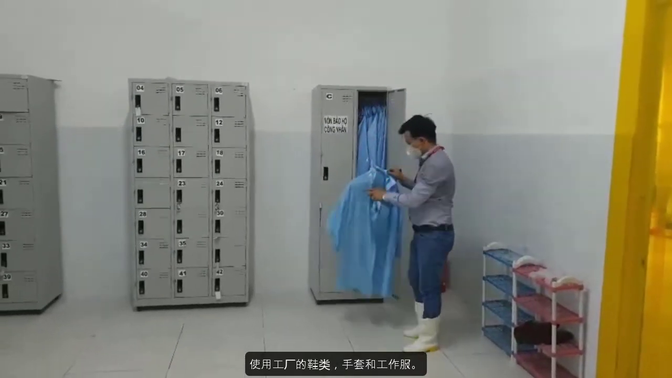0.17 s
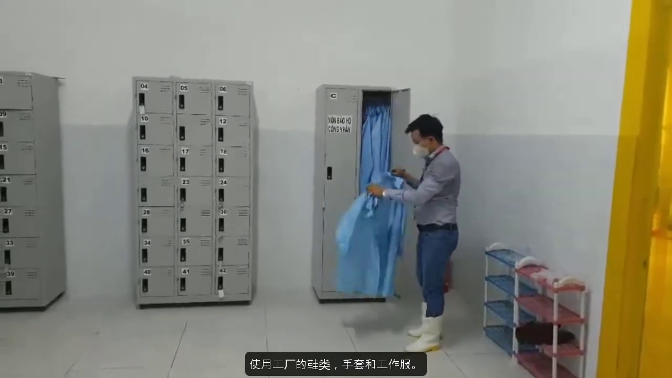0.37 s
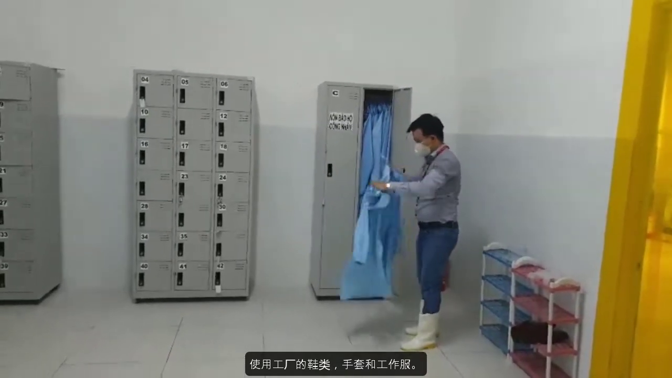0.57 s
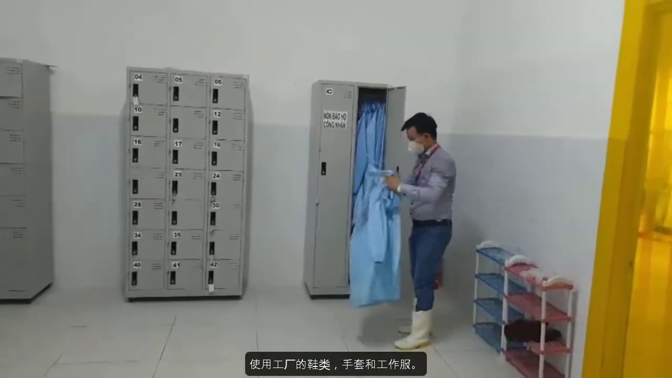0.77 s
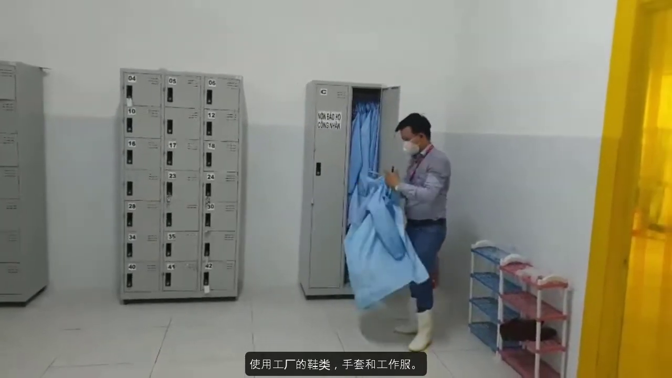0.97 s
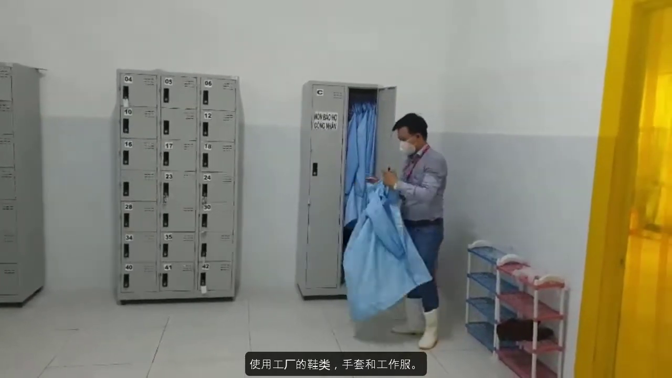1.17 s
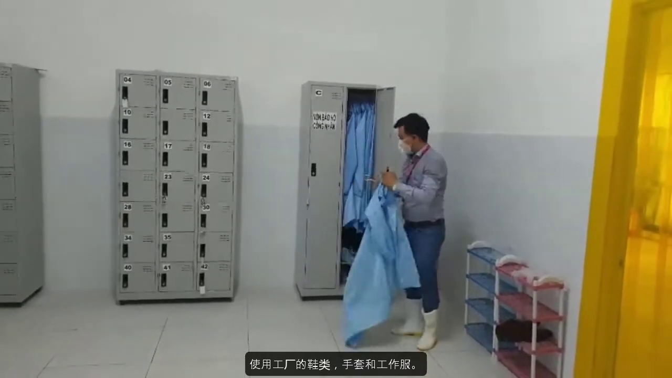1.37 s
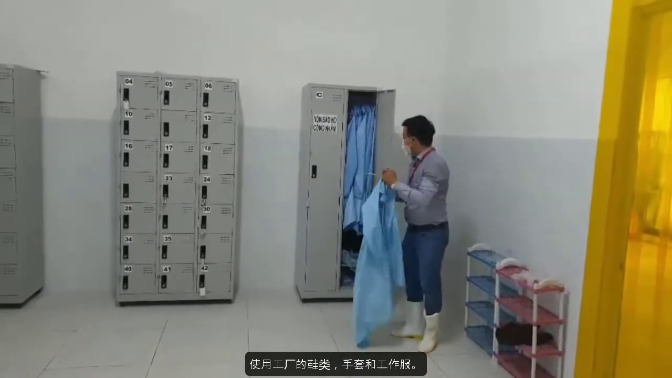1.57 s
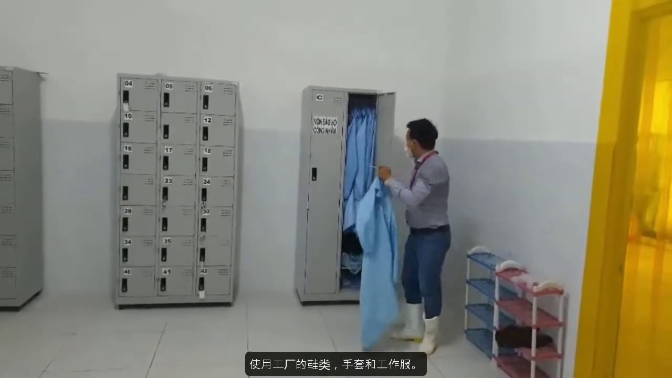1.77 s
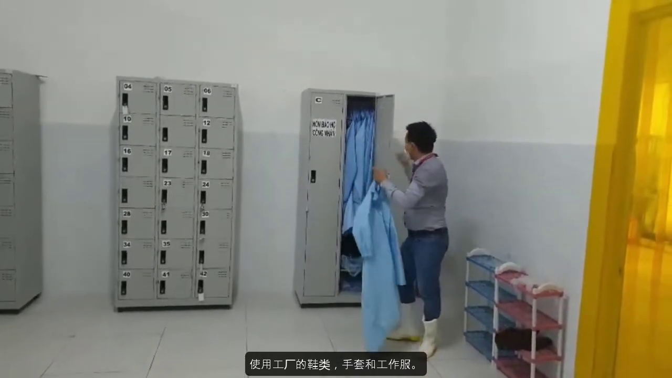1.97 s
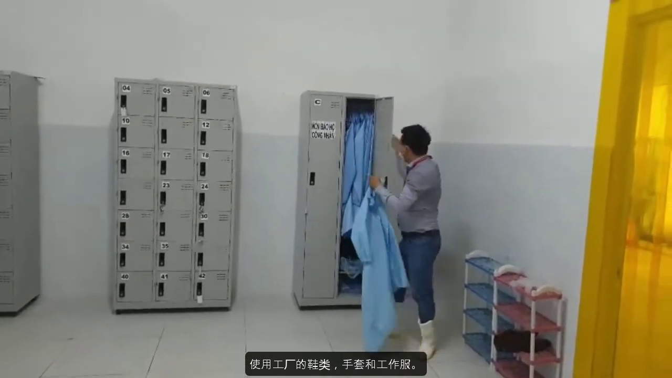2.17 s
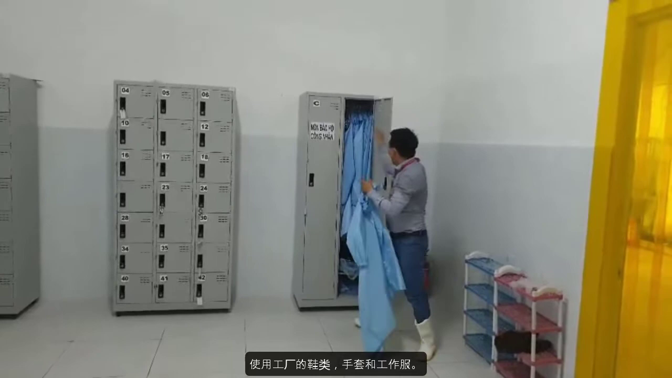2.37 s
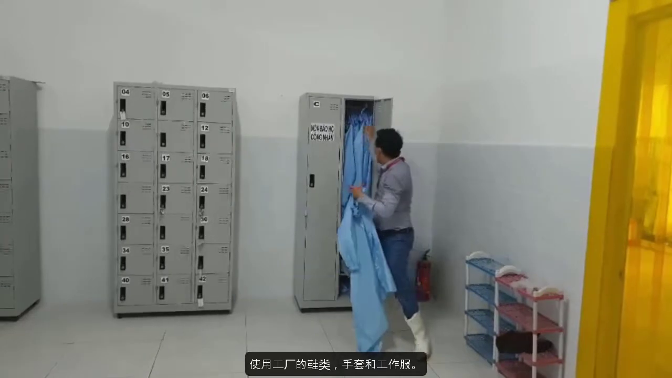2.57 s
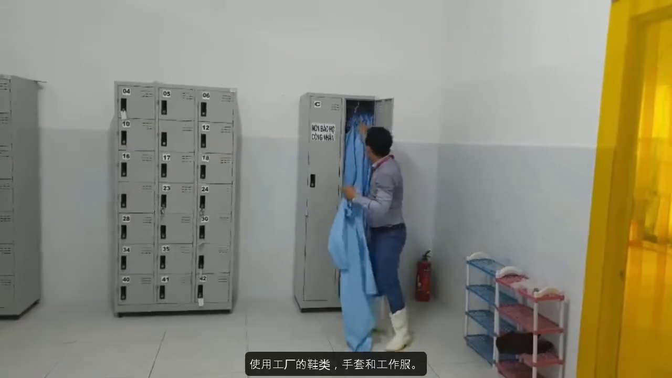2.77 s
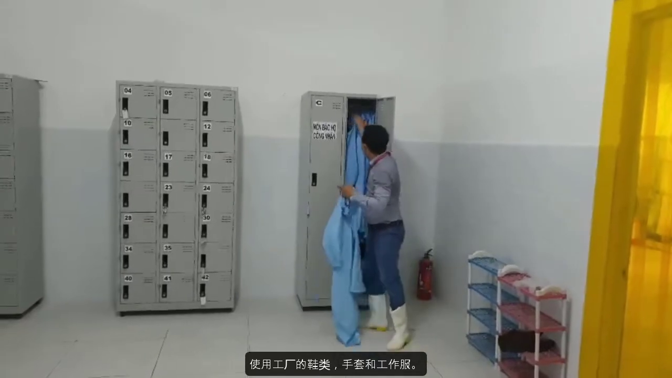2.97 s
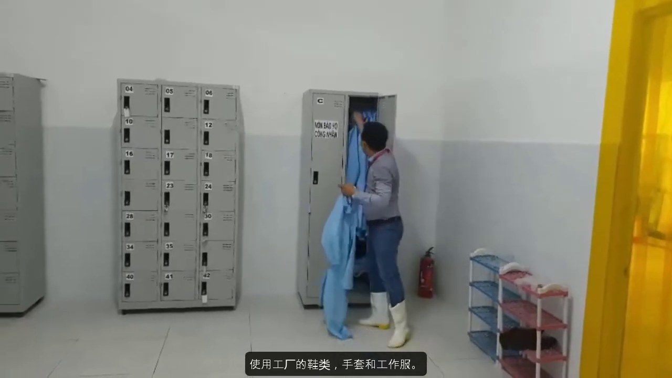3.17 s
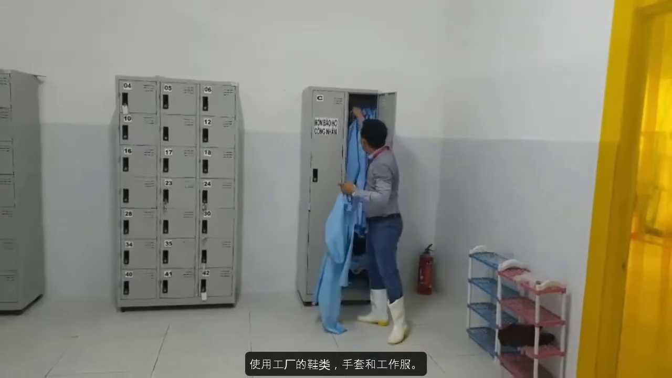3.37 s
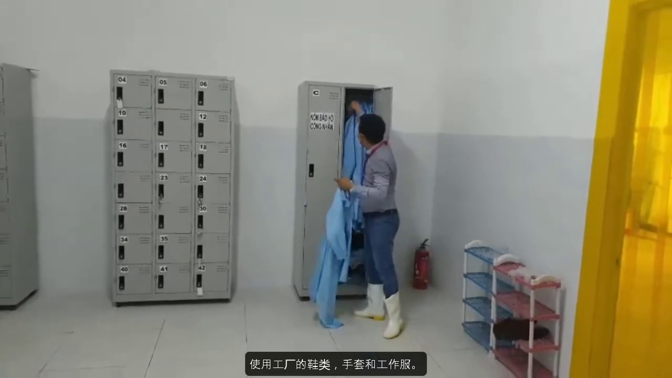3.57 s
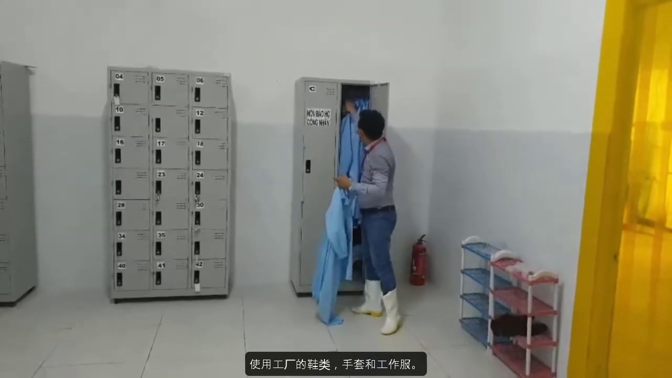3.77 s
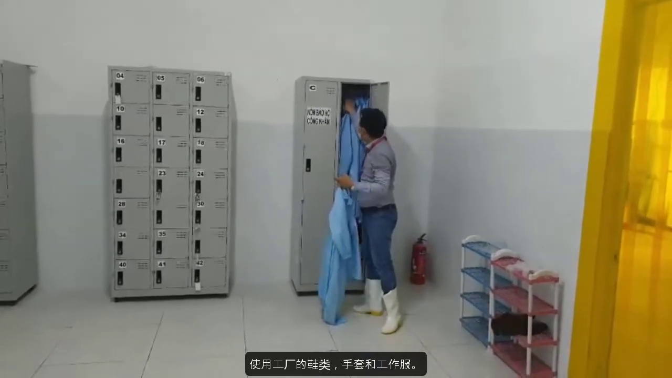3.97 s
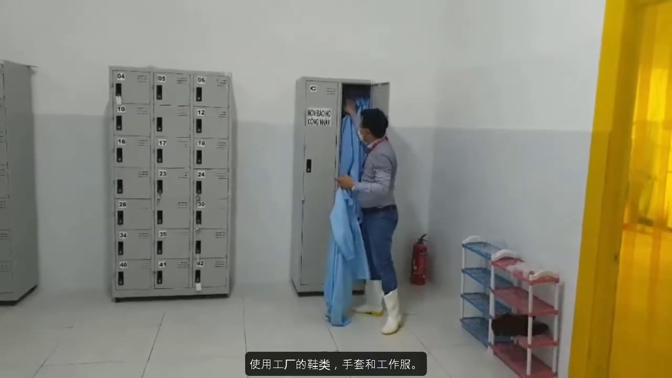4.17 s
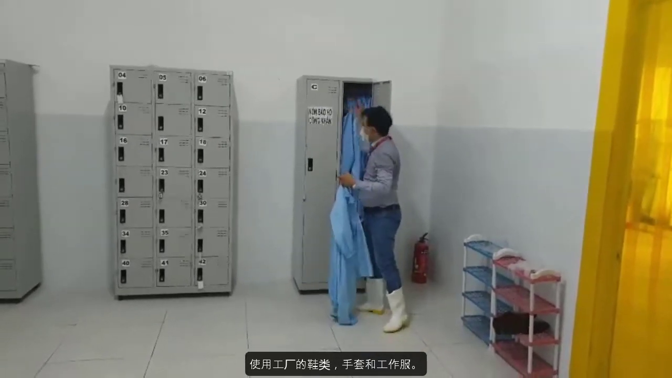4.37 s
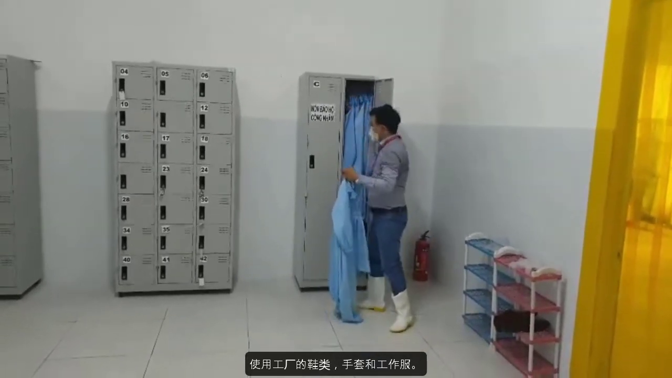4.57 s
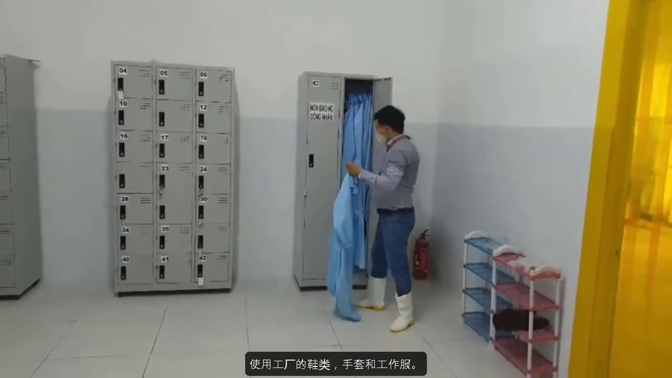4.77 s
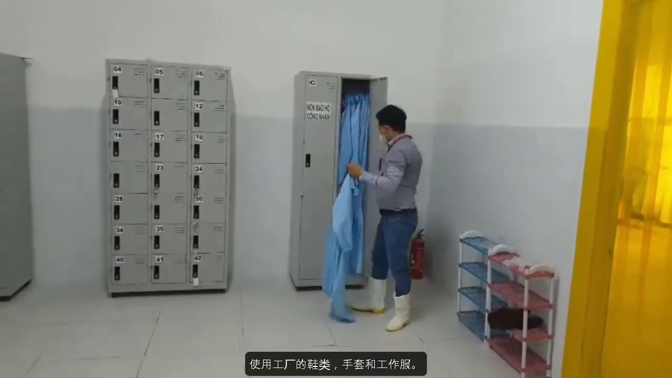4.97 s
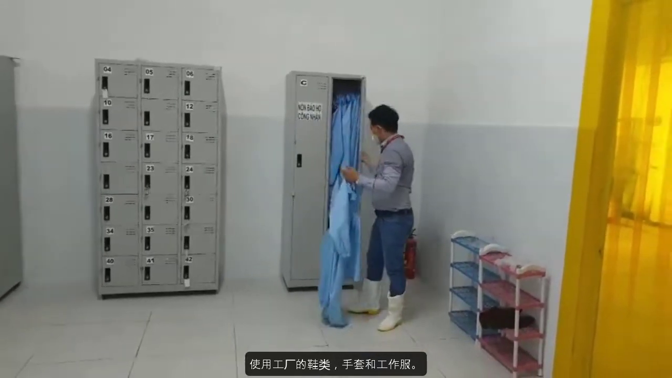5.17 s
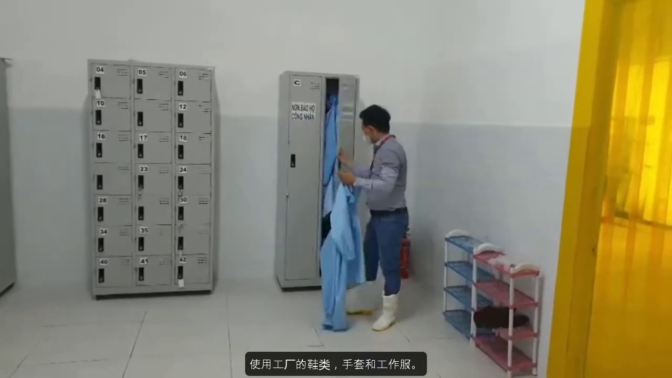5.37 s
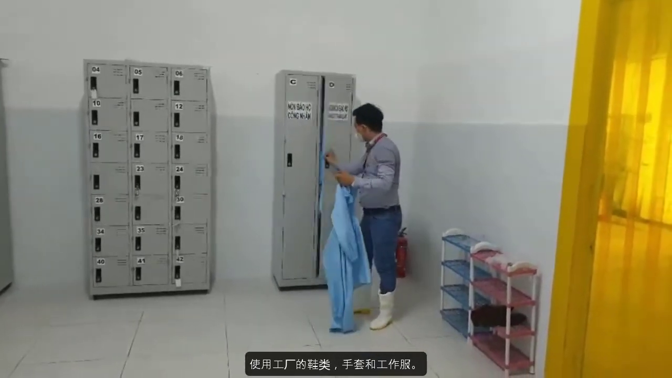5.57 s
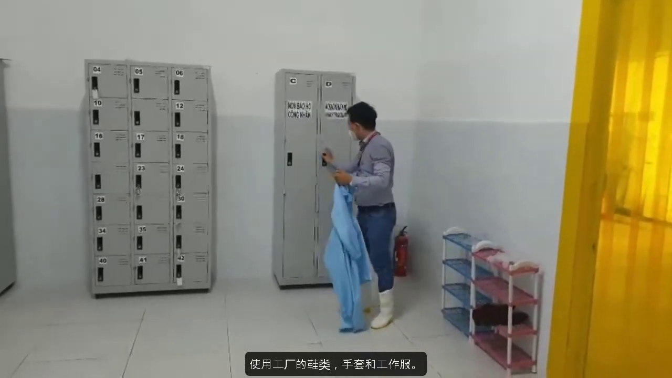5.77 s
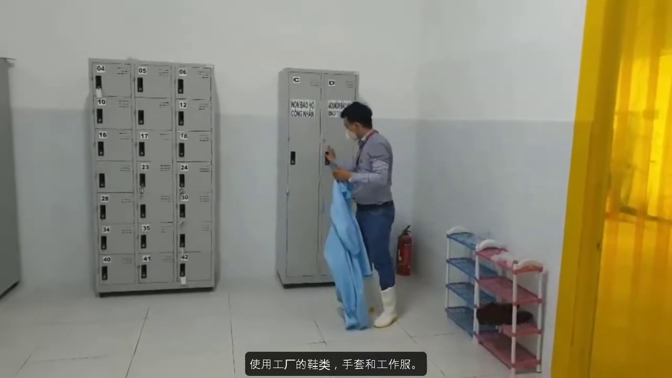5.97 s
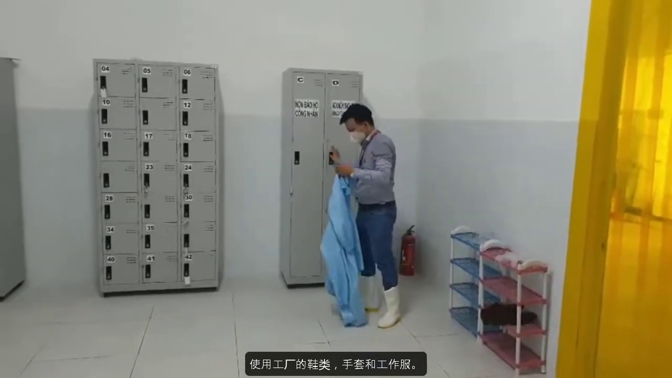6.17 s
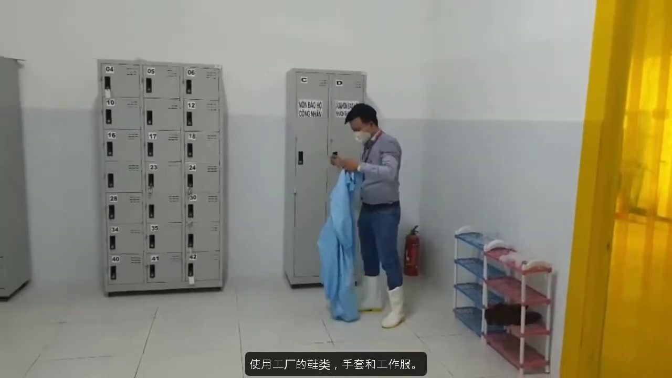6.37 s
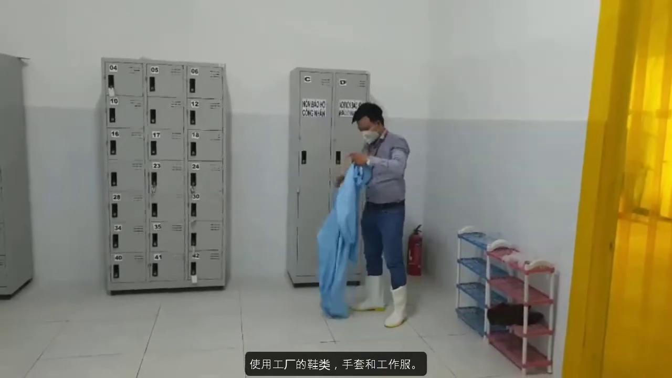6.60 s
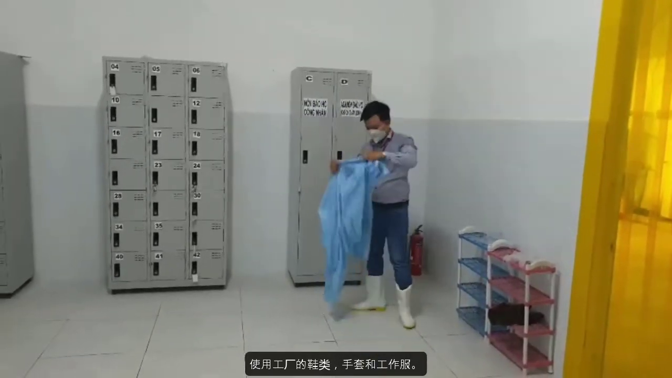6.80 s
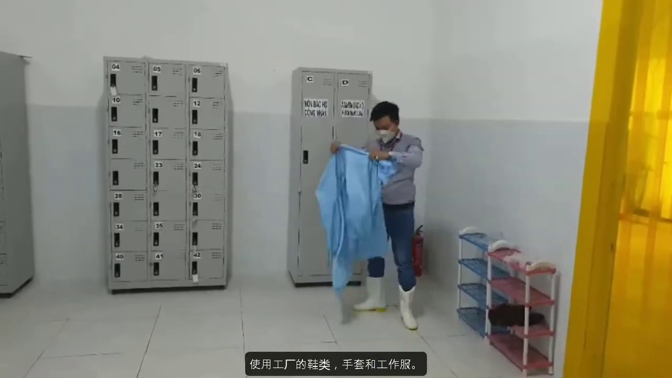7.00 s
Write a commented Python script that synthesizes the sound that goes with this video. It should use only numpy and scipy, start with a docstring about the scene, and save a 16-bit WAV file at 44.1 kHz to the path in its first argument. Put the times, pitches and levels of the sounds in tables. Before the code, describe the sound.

Work clothes rustle and wire hangers tick and scrape on a rail over a low machine hum, then a steel locker door bangs shut.

```python
"""A sheet-steel locker door is pushed shut in a tiled changing room: latch scrapes, a bang of noise and panel modes.
Before that, work clothes rustle (shaped noise), and wire hangers scrape, tick, clink and ring on a rail.
A machine hums throughout: rumbling noise, blurred tones and three wavering sines. The hard walls ring on
as a fading noise tail, and an automatic gain control ducks the hum after the bang."""
import sys
import numpy as np
from scipy import signal
from scipy.fft import rfft, irfft, next_fast_len
from scipy.io import wavfile
from scipy.ndimage import uniform_filter1d, map_coordinates

SR = 44100
rng = np.random.default_rng(int(sys.argv[2]) if len(sys.argv) > 2 else 0)


def boost_factor(decibels):
    """Convert a level in decibels to a linear amplitude factor."""
    exponent = np.asarray(decibels, float) / 20
    return 10 ** exponent


def pcm_store(signal):
    """Save signal as 16-bit PCM."""
    levels = np.round(np.clip(np.atleast_2d(signal), -1, 1) * 32767)
    wavfile.write(sys.argv[1], SR, levels.astype(np.int16).T)


N = 310280  # length of the scene in samples

# Levels are relative: the room, the gain control and the final mix still change them.
# likeness of left and right, 1 = identical: f/Hz, likeness
LEFT_RIGHT_LIKENESS = [(60, 0.98), (180, 0.96), (550, 0.57), (1650, 0.011), (4970, 0.037), (15000, 0.064)]
# how long the walls ring, as the time to fall 60 dB: f/Hz, t60/s
WALL_RINGING = [(100, 0.93), (220, 0.72), (450, 1.37), (1500, 1.65), (4000, 1.26), (7500, 0.92),
                (12000, 0.56)]

# ventilation rumble: f/Hz, level/dB per Hz
AIR_SPECTRUM = [(15, -67), (25, 1.5), (54, -8), (82, 0.5), (146, -8), (169, -8.5), (248, -6), (281, -3),
                (348, -8), (387, -10.5), (716, -11), (985, -22.5), (1270, -25), (1570, -33), (4000, -75),
                (5200, -101), (8800, -120)]
# blurred machine tones: f/Hz, level/dB, width either side/Hz
BLURRED_TONES = [(213.6, -44, 2.1), (299.4, -47, 0.58), (414.6, -44, 3.3), (730, -39.5, 56)]
# the three clear hum lines, one entry each: f/Hz
LINE_PITCHES = [88.4, 141.2, 280.6]
# how far each line's pitch strays, one entry each: size/Hz
LINE_WAVERS = [1.17, 0.55, 0.665]
# the hum lines swell and fade: t/s, then level/dB of each of the three lines, before hum() takes off 2 dB
LINE_SWELLS = [(0.0, -32, -39, -53), (0.08, -30, -40, -55), (0.53, -40.5, -47, -33),
               (0.96, -26.5, -32, -32.5), (1.24, -49, -58, -27), (1.36, -34, -44, -34.5),
               (1.52, -38.5, -37.5, -38), (1.94, -41, -44.5, -35), (2.24, -54, -33, -51),
               (2.37, -33, -33, -26), (2.87, -39, -37.5, -50.5), (3.03, -39, -46, -61),
               (3.43, -34, -30.5, -37.5), (3.81, -62, -55, -40), (3.96, -32, -37, -33),
               (4.12, -38, -40.5, -56), (4.24, -30, -35.5, -33.5), (4.52, -31.5, -36.5, -32.5),
               (4.72, -30, -47, -47), (4.86, -34, -31.5, -44), (5.15, -44, -46, -33),
               (5.24, -24.5, -40, -42), (5.53, -38.5, -38.5, -60), (5.58, -35, -59, -35),
               (5.68, -27.5, -38, -50), (5.95, -34.5, -30.5, -41), (6.55, -61, -48, -38),
               (6.716, -29.5, -35.5, -37.5), (6.998, -35, -38, -33.5), (7.036, -51, -49, -56)]

# cloth being handled: t/s, rustle level/dB, brightness/dB (top-octave sheen over dull swish)
CLOTH_MOVES = [(0, -47, -5), (.23, -54.5, -9), (.47, -45, 4), (.65, -47, 2.5), (1.1, -50.5, -1.5),
               (1.46, -46.5, 4), (1.71, -50.5, -2), (2.1, -59, -9), (2.75, -60.5, -10.5), (2.9, -45, -15),
               (3.3, -52.5, -5), (3.5, -49.5, -15), (3.74, -48, -14), (3.84, -39.5, -8), (3.97, -43, -19),
               (4.2, -48.5, -12), (4.45, -51, -3), (4.96, -64, -13), (5.065, -42.5, -9), (5.22, -52, -17.5),
               (5.42, -52, -5), (5.61, -48.5, -4), (5.9, -49.5, -3), (6.75, -48, -7), (6.89, -44.5, 0),
               (7.04, -47, -3)]
# dull swish of sliding folds: f/Hz, level/dB per Hz
SWISH_SPECTRUM = [(250, -3), (500, 4), (900, 2.5), (1300, 1.5), (1800, 1.5), (2500, -1), (4500, -18),
                  (6000, -44)]
# crinkle of stiff fabric: f/Hz, level/dB per Hz
CRINKLE_SPECTRUM = [(1650, -10), (2800, -6.5), (3050, -11), (3870, -5.5), (6490, -0.5), (8200, -10.5),
                    (10700, -11.5), (18000, -120)]
# airy top of the cloth sound: f/Hz, level/dB per Hz
SHEEN_SPECTRUM = [(5000, -12), (8200, -9), (11400, -1.5), (13500, -4.5), (15700, -8)]
SWISH_SHARE = 0.43  # part of the brightness taken from the swish

# In the next three tables, stroke() takes 7.5 dB per octave off the tilt.
# sharp knocks of a hook on the rail: t/s, level/dB, length/s, tilt/dB per octave
HOOK_TICKS = [(2.796, -34, .004, 10), (2.805, -25, .003, 10), (2.8125, -21, .002, 10),
              (2.821, -23, .003, 10), (3.164, -28, .005, 8), (3.291, -25.5, 0.004, 8.5),
              (3.422, -28, .005, 10), (3.489, -19, 0.008, 11), (3.660, -18.5, 0.007, 10),
              (3.774, -30, .005, 1), (3.976, -24, .01, 12), (4.042, -30, .004, 0)]
# hangers scrape on the rail: t/s, level/dB, length/s, tilt/dB per octave
HANGER_SCRAPES = [(2.8, -30.5, 0.039, 9.5), (3.164, -34, 0.017, 8), (3.294, -37, 0.017, 4),
                  (3.421, -30, 0.022, 9), (3.448, -36, 0.036, 6.5), (3.501, -38, 0.023, 6),
                  (3.662, -36.5, 0.019, 4.5), (3.783, -34, 0.026, 1.5), (3.839, -37, 0.028, 2.5),
                  (3.9, -38.5, 0.048, 7), (3.963, -34, 0.021, 18)]
# the latch scrapes on the frame: t/s, level/dB, length/s, tilt/dB per octave
LATCH_SCRAPES = [(5.906, -30, 0.015, 1.5), (5.939, -30.5, 0.033, -1), (6.048, -4, 0.0065, 12),
                 (6.073, -24, 0.0042, 12)]
# gritty steel contact: f/Hz, level/dB per Hz
GRIT_SPECTRUM = [(880, 1.5), (1500, 1), (2450, 1), (3620, -2.5), (5310, 0), (7120, 4), (7630, -0.5),
                 (12600, 9), (14200, 4.5), (15800, 4)]
# high modes of the hanger wire, before random shifts: f/Hz, level/dB, t60/s
WIRE_MODES = [(7060, 0, 0.015), (10400, 2, 0.006), (11600, 3, 0.006), (12700, 3, .008), (14200, 2, .008)]
# single clear clinks, before random level shifts: t/s, f/Hz, level/dB, t60/s
CLINK_EVENTS = [(2.797, 12590, -33, .07), (2.855, 2470, -38, 0.098), (2.925, 2490, -41, 0.081),
                (3.487, 12800, -38, .07), (3.66, 6260, -26, 0.066), (3.66, 11500, -40, .03),
                (3.9, 14200, -35, 0.17), (3.938, 7130, -31, 0.053), (4.268, 11100, -32, 0.058),
                (4.31, 11200, -34, .04), (4.35, 11000, -44, .04), (4.4, 11200, -48, .04),
                (5.91, 1248, -41, 0.2), (6.0515, 12900, -7, .06), (6.05, 4400, -13, 0.043)]
# locker sides bumped by an arm or shaken by the door, before random level shifts: t/s, f/Hz, level/dB
THUD_EVENTS = [(2.808, 188, -18), (2.842, 214, -21), (2.876, 304, -20), (2.915, 251, -20),
               (2.946, 294, -23), (2.986, 275, -27), (3.907, 300, -26), (3.938, 297, -27),
               (3.968, 330, -19), (4.072, 280, -24), (6.072, 127.6, -5.5), (6.105, 182, -4.5),
               (6.113, 75, -9), (6.141, 202, -5), (6.177, 212, -8.5)]
# a struck hanger rings on: t/s, starting f/Hz, level/dB, t60/s
HANGER_RINGS = [(3.289, 2915, -42.5, 1.2)]

# the door meets the frame and rattles: t/s, crash level/dB, boom level/dB
DOOR_BLOWS = [(6.034, -29, -24.5), (6.0502, -8.5, -22), (6.061, -16, -18.5), (6.074, -6, -16.5),
              (6.087, -12, -15.5), (6.112, -14.5, -15), (6.14, -16.5, -18.5), (6.165, -26, -20),
              (6.186, -24, -24)]
# broadband crash of the door, from bass to treble: f/Hz, level/dB per Hz
CRASH_SPECTRUM = [(35, -44), (60, -8), (121, -5), (200, -3), (299, -9), (360, -8.5), (487, -9), (522, -4.5),
                  (1210, -10.5), (1550, -12.5), (3210, -11), (4300, -11), (6440, -8.5), (7950, -21),
                  (15600, -11.5)]
# separate ringing modes of the door panel, before random shifts: f/Hz, level/dB, t60/s
PANEL_MODES = [(61.4, -6, 0.33), (163, -1, 0.091), (204, -4.5, 0.14), (303.4, -7, 0.21), (378, -10, 0.14),
               (490, -9, 0.16), (663, -7.5, 0.14), (713, -3, 0.094), (873, 0, 0.09), (981, -4.5, 0.12),
               (1095, -1, 0.082), (1187, 0.5, 0.074), (1216, 0.5, 0.07), (1302, -5, 0.1)]


def unit(x):
    """Scales a sound to an average strength (rms) of 1."""
    return x / np.sqrt(np.mean(x ** 2) + 1e-20)


def along(points, hz):
    """Reads a curve of (Hz, value) points with frequency on a log axis."""
    f, value = np.transpose(points)
    return np.interp(np.log(hz + 1), np.log(f + 1), value)


def filtered(x, response):
    """Makes each frequency stronger or weaker by the given response."""
    n = x.shape[-1]
    padded = next_fast_len(n + 8192)
    hz = np.fft.rfftfreq(padded, 1 / SR)
    return irfft(rfft(x, padded) * response(hz), padded)[..., :n]


def wobble(rate):
    """A smooth random curve with `rate` random points a second."""
    points = rng.standard_normal(int(N * rate / SR) + 4)
    return map_coordinates(points, [np.arange(N) * rate / SR])


def pair(noise, gain):
    """Turns two noises into left and right: alike in the bass, nearly unrelated in the treble."""
    def turn(hz):
        return np.arccos(np.clip(along(LEFT_RIGHT_LIKENESS, hz), -1, 1)) / 2

    mid, side = filtered(noise, lambda hz: gain(hz) * [np.cos(turn(hz)), np.sin(turn(hz))])
    return np.array([mid + side, mid - side])


def rush(gain):
    """Steady stereo noise of rms 1, coloured by the gain."""
    return unit(pair(rng.standard_normal((2, N)), gain))


def tone(hz, waver_hz, rate):
    """A sine of rms 1 whose pitch wanders."""
    cycles = np.cumsum(hz + waver_hz * wobble(rate)) / SR
    return np.sqrt(2) * np.sin(2 * np.pi * (cycles + rng.random()))


def ring(modes, t, spread_db, detune=0):
    """Struck metal as fading sines, each with a random strength and phase, and pitch if detuned."""
    hz, db, t60 = np.transpose(modes)[:, :, None]
    draw = rng.standard_normal((3, len(modes), 1))
    hz = hz * (1 + detune * draw[2])
    strength = boost_factor(db + spread_db * draw[0] - 60 * t / t60)
    return np.sum(strength * np.sin(2 * np.pi * hz * t + 2 * draw[1]), axis=0)


def add(track, s, sound):
    """Mixes a sound in at time s, cut off at the end of the track."""
    part = track[:, round(s * SR):][:, :sound.shape[1]]
    part += sound[:, :part.shape[1]]


def room(x, wet_db):
    """Direct sound plus a fresh noise tail from the walls; each frequency dies at its own speed."""
    hz, t, z = signal.stft(rng.standard_normal((2, SR)), SR, nperseg=256)
    fading = z * boost_factor(-60 * t / along(WALL_RINGING, hz)[:, None])
    tail = signal.istft(fading, SR, nperseg=256)[1]
    tail = pair(tail, np.ones_like)
    tail = tail * np.minimum(np.arange(tail.shape[1]) / (0.00081 * SR), 1)  # fades in over 0.81 ms
    response = boost_factor(wet_db) * tail / np.linalg.norm(tail[0])
    response[[0, 1], [0, 2]] = 1  # the direct sound reaches the right side two samples later
    return signal.fftconvolve(x[None], response, axes=1)


def stroke(length, tilt_db, t):
    """A short gritty stroke on steel: noise that rises fast, fades, and is tilted towards bass or treble."""
    shape = np.clip(t / (0.00036 + 0.029 * length), 0, 1) * np.exp(-(t / length) ** 2)
    grit = shape * rng.standard_normal(len(t))

    def colour(hz):
        octaves = np.log2((hz + 200) / 8000)
        return boost_factor(along(GRIT_SPECTRUM, hz) + (tilt_db - 7.5) * octaves)

    sound = filtered(grit, colour)
    return sound / np.sqrt(np.sum(sound ** 2) / np.sum(shape ** 2))


def hum():
    """Broad rumble of moving air, blurred machine tones and three clear wavering lines."""
    air = boost_factor(-29.0 + 0.18 * wobble(0.47)) * rush(lambda hz: boost_factor(along(AIR_SPECTRUM, hz)))
    blurred = sum(boost_factor(db) * rush(lambda f: 1 / (1 + ((f - hz) / width) ** 2))
                  for hz, db, width in BLURRED_TONES)
    s, *levels = np.transpose(LINE_SWELLS)
    lines = 0
    for hz, waver_hz, db in zip(LINE_PITCHES, LINE_WAVERS, levels):
        swell_db = np.interp(np.arange(N) / SR, s, db) - 2.0 + 1.0 * wobble(7)
        lines = lines + boost_factor(swell_db) * tone(hz, waver_hz, rate=4.044)
    return air + blurred + lines


def cloth():
    """Folds slide (a dull swish of noise) and stiff fabric crinkles (a fluttering hiss with a bright sheen)."""
    s, *controls = np.transpose(CLOTH_MOVES)
    level_db, bright_db = [np.interp(np.arange(N) / SR, s, db) for db in controls]
    swish_db = level_db - SWISH_SHARE * bright_db
    flutter = wobble(23)  # shared, so crinkle and sheen flicker together
    swish = boost_factor(swish_db + 0.46 * wobble(24)) * rush(lambda hz: boost_factor(along(SWISH_SPECTRUM, hz)))
    crinkle = boost_factor(level_db + 0.64 * flutter) * rush(lambda hz: boost_factor(along(CRINKLE_SPECTRUM, hz)))
    sheen = boost_factor(swish_db + bright_db + 2.0 * flutter) * rush(lambda hz: boost_factor(along(SHEEN_SPECTRUM, hz)))
    return swish + crinkle + sheen


def ticks():
    """A hook knocks the rail: a very short stroke that also sets the wire's high modes ringing."""
    out, t = np.zeros((2, N)), np.arange(SR // 4) / SR
    for s, db, length, tilt_db in HOOK_TICKS:
        wire = boost_factor(-12) * ring(WIRE_MODES, t, spread_db=4, detune=0.03)
        knock = stroke(length, tilt_db, t) + wire
        add(out, s, boost_factor(db) * room(knock, wet_db=-4))
    return out


def clinks():
    """Struck steel rings in one clear mode."""
    out, t = np.zeros((2, N)), np.arange(SR // 2) / SR
    for s, *mode in CLINK_EVENTS:
        add(out, s, room(ring([mode], t, spread_db=1.5), wet_db=-5))
    return out


def scrapes():
    """Hangers rub on the rail and the latch on the frame: gritty strokes with a strong wall tail."""
    out, t = np.zeros((2, N)), np.arange(SR // 4) / SR
    for s, db, length, tilt_db in HANGER_SCRAPES + LATCH_SCRAPES:
        add(out, s, boost_factor(db) * room(stroke(length, tilt_db, t), wet_db=9.0))
    return out


def thuds():
    """The locker's sides boom softly in one low mode: a slow rise, a short ring, a little room."""
    out, t = np.zeros((2, N)), np.arange(SR // 4) / SR
    rise_s, t60_s = 0.0099, 0.15
    for s, hz, db in THUD_EVENTS:
        boom = ring([(hz, db, t60_s)], t, spread_db=1.5) * (1 - np.exp(-t / rise_s))
        add(out, s, room(boom, wet_db=-10))
    return out


def hanger_ring():
    """A struck hanger rings on: a thin wavering tone that beats about 31 times a second, sags and fades."""
    out, t = np.zeros((2, N)), np.arange(SR // 2) / SR
    waver_hz, sag_hz_per_s, beats_per_s = 30, 200, 31
    for s, hz, db, t60 in HANGER_RINGS:
        beats_db = 3 * (np.cos(2 * np.pi * beats_per_s * (t - 0.01)) - 1)  # dips of 6 dB
        onset_db = 6 * np.exp(-(t / 0.02) ** 2)  # louder at first
        level_db = db - 60 * t / t60 + beats_db + onset_db + 2.5 * wobble(60)[:len(t)]
        pitch = hz - sag_hz_per_s * np.arange(N) / SR
        sound = boost_factor(level_db) * tone(pitch, waver_hz, rate=50)[:len(t)]
        add(out, s, room(sound * (1 - np.exp(-t / 0.003)), wet_db=-10))
    return out


def door():
    """Each blow gives a broadband crash of clattering noise, bass to treble, and a boom of the panel's modes."""
    out, t = np.zeros((2, N)), np.arange(SR // 2) / SR
    for s, crash_db, boom_db in DOOR_BLOWS:
        noise = unit(filtered(rng.standard_normal(len(t)), lambda hz: boost_factor(along(CRASH_SPECTRUM, hz))))
        clatter_db = 3.5 * wobble(300)[:len(t)] - 1.5
        crack = 1 + 0.9 * boost_factor(-60 * t / 0.014)  # steel on steel: a brief extra edge
        crash = crack * boost_factor(crash_db + clatter_db - 60 * t / 0.084) * noise
        panel = ring(PANEL_MODES, t, spread_db=2.5, detune=0.012)
        boom = boost_factor(boom_db) * panel * (1 - np.exp(-t / 0.0043))
        add(out, s, room(crash, wet_db=7.0) + room(boom, wet_db=-0.5))
    return out


def scene():
    """All the sounds together, 1 dB louder on the left than on the right."""
    mix = hum() + cloth() + ticks() + clinks() + scrapes() + thuds() + hanger_ring() + door()
    return mix * boost_factor([[0.5], [-0.5]])


def top_cut(x):
    """Nothing passes above the cut-off."""
    return signal.sosfilt(signal.butter(12, 15750, fs=SR, output="sos"), x)


def record(dry):
    """Gain control turns loud sound down and recovers slowly; peaks clip, and deep bass and top treble go."""
    hop = 128  # samples between gain steps
    power = uniform_filter1d(np.mean(dry ** 2, axis=0), size=2048)[::hop]
    level_db = 10 * np.log10(np.abs(power) + 1e-12)
    over_db = 0.24 * np.maximum(level_db + 22, 0)  # threshold at -22 dB
    recovery_db = 0.5 * np.arange(len(over_db)) * hop / SR  # half a dB regained per second
    cut_db = np.maximum.accumulate(over_db + recovery_db) - recovery_db
    cut_db = uniform_filter1d(np.maximum(cut_db, 0), size=41, origin=20)  # takes hold over about 0.12 s
    ducked = dry * boost_factor(-np.interp(np.arange(N), np.arange(len(cut_db)) * hop, cut_db))
    clipped = np.clip(ducked, -1, 1)
    mix = filtered(clipped, lambda hz: (hz < 15760) / (1 + (45 / (hz + 1)) ** 4))
    return top_cut(mix)


dry = scene()
out = record(dry)
pcm_store(out)
```